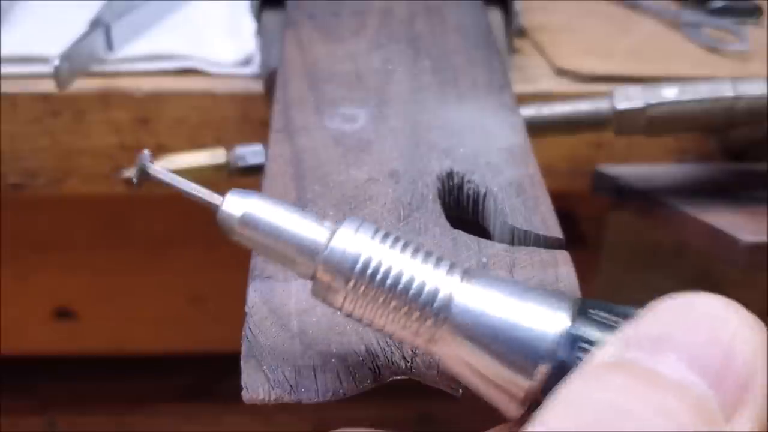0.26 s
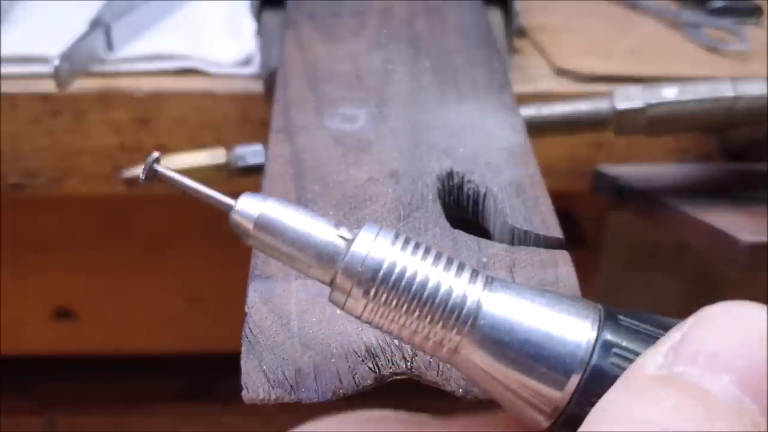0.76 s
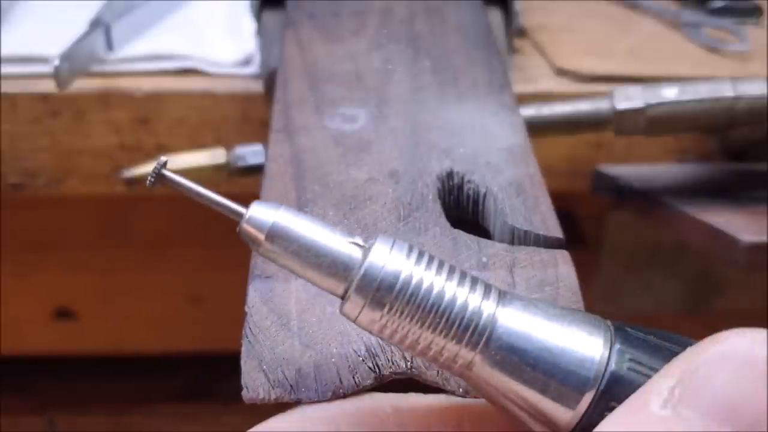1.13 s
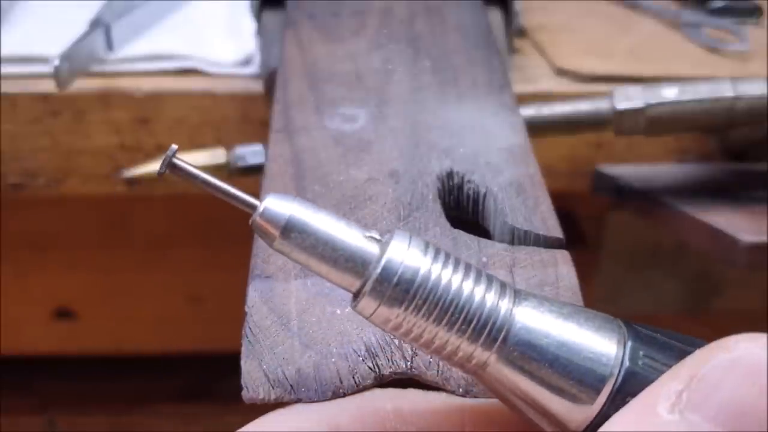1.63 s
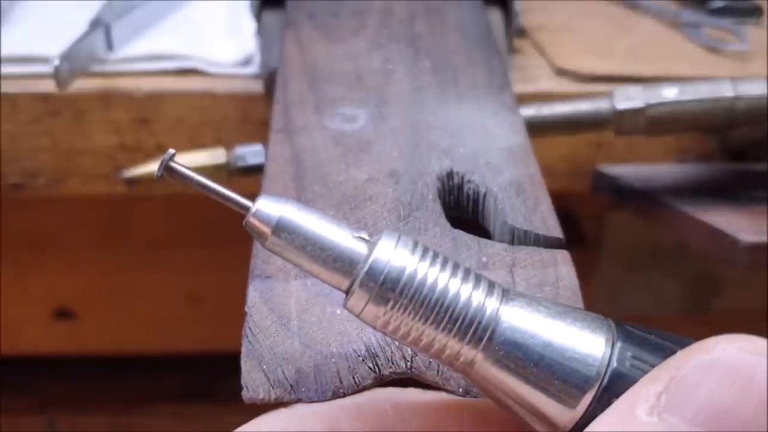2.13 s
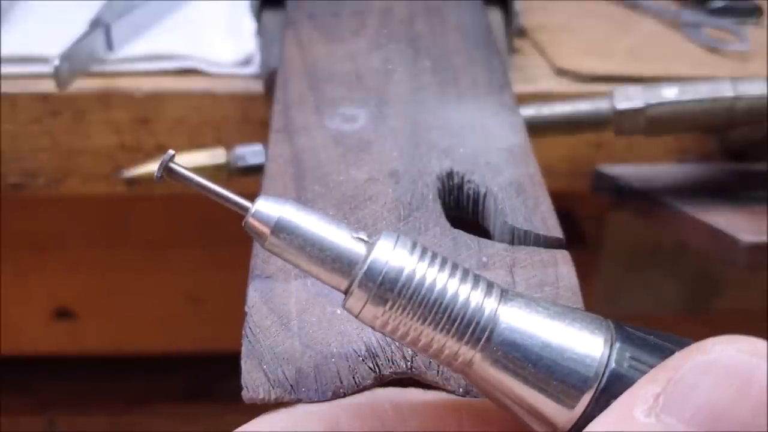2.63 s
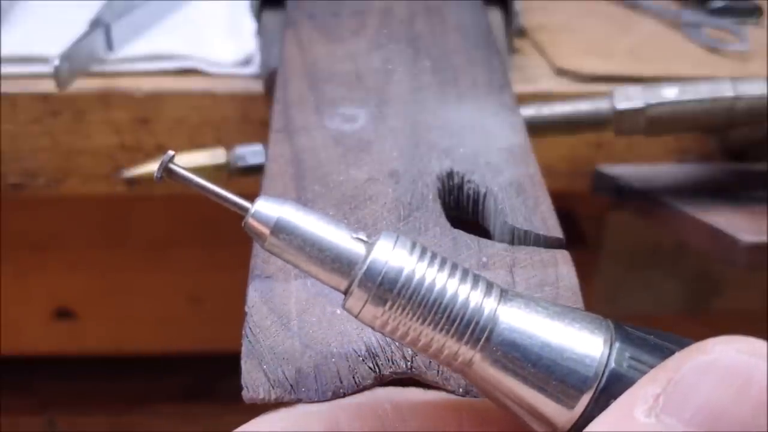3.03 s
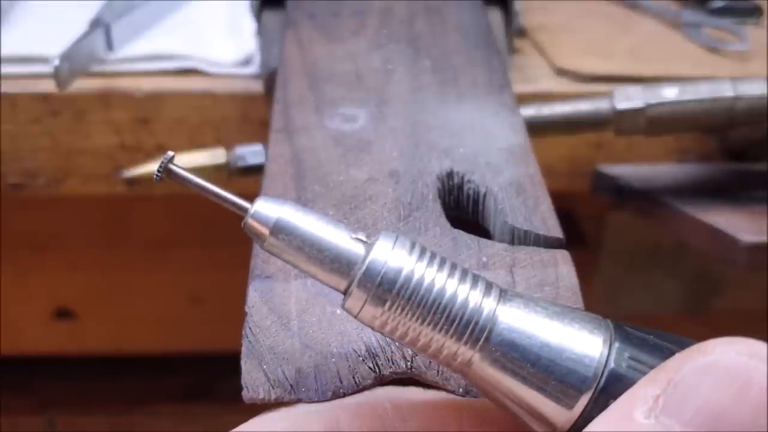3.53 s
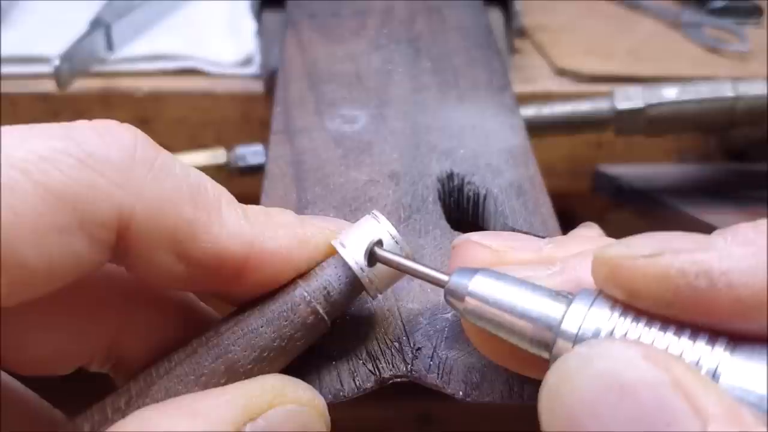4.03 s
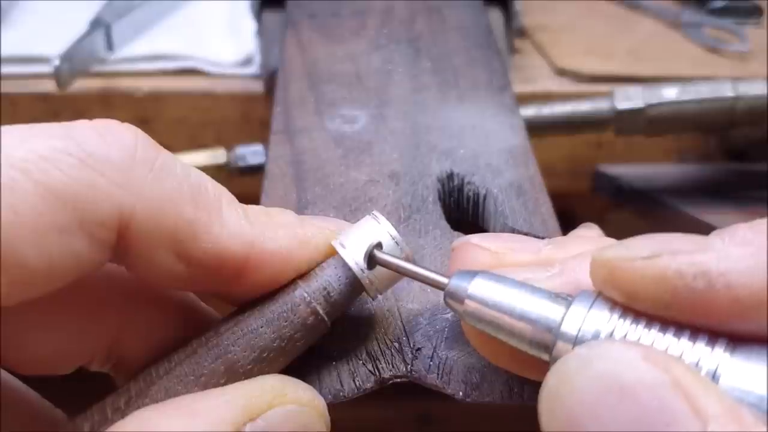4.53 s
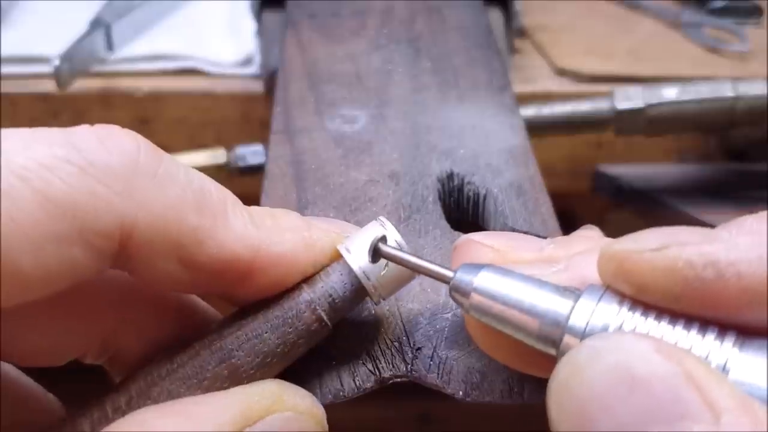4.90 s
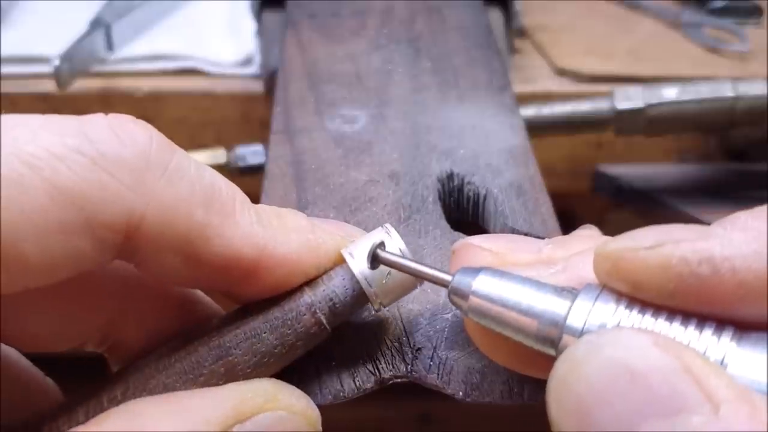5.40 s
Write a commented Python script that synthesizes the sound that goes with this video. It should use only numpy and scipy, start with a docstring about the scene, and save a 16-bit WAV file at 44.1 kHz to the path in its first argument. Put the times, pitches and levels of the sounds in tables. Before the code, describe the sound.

A faint room hiss with low hum and rumble; a click and two soft wooden knocks. A jeweller's motor tool bursts on and winds down over two seconds. Following a near-silent gap with light ticks, it starts abruptly at speed, its burr scraping metal with a bright buzzing rasp, easing off briefly, then biting in again until the end.

```python
"""In a small workshop, a latch clicks and a jeweller's rotary handpiece is blipped and coasts to rest.
Then, at full speed, its burr is pressed twice into a metal ring held on a wooden peg.
Coloured noise makes the rush and scrape; ball bearings whine at multiples of the shaft speed.
Under load the shaft slows and the burr whirls, adding low tones. Behind it lie room hiss, mains hum
and rumble; ticks ring briefly and two knocks excite the modes of the bench."""
import sys
import numpy as np
from scipy import signal
from scipy.fft import rfft, irfft
from scipy.io import wavfile
from scipy.ndimage import uniform_filter1d

SR = 44100
rng = np.random.default_rng(int(sys.argv[2]) if len(sys.argv) > 2 else 0)


def unload_wav(signal):
    """Save mono or channel-first audio to the path in sys.argv[1] as 16-bit WAV at rate SR, clipped to [-1, 1]."""
    wavfile.write(
        sys.argv[1],
        SR,
        np.round(np.clip(np.atleast_2d(signal).T, -1, 1) * 32767).astype(np.int16),
    )


N = 249606
T = np.arange(N) / SR   # seconds
HZ = np.maximum(np.fft.rfftfreq(N, 1 / SR), 1)


def amp(db):
    """Decibels to an amplitude factor."""
    return 10 ** (np.asarray(db) / 20)


def rms_of(x):
    """Root mean square level."""
    return np.sqrt(np.mean(x ** 2))


def rms_one(x):
    """The sound scaled to rms 1."""
    return x / np.sqrt(np.mean(x ** 2) + 1e-20)


def in_time(rows):
    """Every column after the first, drawn as a line through its points in seconds."""
    seconds, *columns = np.transpose(rows)
    return [np.interp(T, seconds, column) for column in columns]


def at_hz(points):
    """A curve through (Hz, value) points, straight over log frequency."""
    hz, value = np.transpose(points)
    return np.interp(np.log(HZ), np.log(np.maximum(hz, 1)), value)


def drift(rate):
    """Slow chance, new about rate times a second; spread about 1."""
    count = int(N / SR * rate) + 2
    return np.interp(T * rate, np.arange(count), rng.standard_normal(200)[:count])


def hiss(spectrum, gate=1):
    """Two unrelated noises, gated, then coloured; rms 1."""
    noise = gate * rng.standard_normal((2, N))
    return rms_one(irfft(rfft(noise) * amp(at_hz(spectrum)), N))


def blurred_tone(hz, blur_hz):
    """Two sines whose pitch wavers at random, smoothly, which widens the line; rms 1."""
    waver = uniform_filter1d(rng.standard_normal((2, N)), size=24, axis=1)
    step = 2 * np.pi * hz / SR + np.sqrt(2 * np.pi * blur_hz / SR) * waver
    audible = hz < SR / 2   # silent where it would alias
    return np.sqrt(2) * np.sin(np.cumsum(step, axis=1)) * audible


def patchy(x, patchy_db):
    """Level flickers in patches about 500 Hz wide and 20 ms long; rms 1."""
    z = signal.stft(x, nperseg=256)[2]
    chance = rng.standard_normal(z.shape[1:])
    field = uniform_filter1d(uniform_filter1d(chance, size=3, axis=0), size=6, axis=1)
    flickering = z * amp(patchy_db * rms_one(field))
    return rms_one(signal.istft(flickering, nperseg=256)[1][:, :N])


def placed(pair, lag_s, pan, alike):
    """The right channel gets a delayed share of the left signal plus an unrelated one of its own."""
    a, b = rfft(pair)
    alike = np.clip(alike, 0, 1)
    tilt = amp(at_hz(pan) / 2)
    right = alike * a * np.exp(-2j * np.pi * HZ * lag_s) + np.sqrt(1 - alike ** 2) * b
    return irfft(np.array([a * tilt, right / tilt]), N)


def ring(clicks, hz, t60):
    """A struck mode: a two-pole resonator dying by 60 dB in t60 seconds."""
    r, w = amp(-60 / (t60 * SR)), 2 * np.pi * hz / SR
    return signal.lfilter([0, np.sin(w)], [1, -2 * r * np.cos(w), r * r], clicks + 1e-18)


def background():
    """Room hiss with mains hum, lumpy rumble, and a brighter opening hiss that stops short."""
    # Room hiss. Each row: frequency in Hz, density in dB per Hz.
    room_colour = [(59, -33.5), (100, -13), (135, -6.5), (177, -13.5), (315, -16), (891, -21.5),
                   (2370, -31.5), (3120, -44), (4290, -31), (5770, -37), (7700, -42), (9610, -68),
                   (16000, -75)]
    # Room level. Each row: time in seconds, level in dB.
    room_level = [(0, -57.5), (.3, -58), (1.4, -60.5), (3.5, -64.5), (3.82, -61.5), (4.0, -69.5),
                  (5.66, -75.5)]
    # Stereo tilt of the room. Each row: frequency in Hz, left minus right in dB.
    room_pan = [(60, -5), (110, -0.5), (200, -7.5), (380, 2), (700, -1), (1290, -3), (2380, 0), (4400, -7),
                (8120, 3), (15000, -2)]
    # Mains hum. One row: frequency in Hz, level over the room hiss in dB.
    mains_hz, mains_db = (120, 0.54)
    # Low rumble. Each row: frequency in Hz, density in dB per Hz.
    rumble_colour = [(12, -55.5), (25, -27), (38, 1), (52, 3), (68, 5), (88, -3.5), (105, -19.5),
                     (150, -44)]
    # Rumble level before its lumps. Each row: time in seconds, level in dB.
    rumble_level = [(0.0, -52), (1.5, -52.5), (2.2, -59.5), (3.88, -52.5), (3.94, -55.5), (4.68, -60),
                    (4.87, -72), (5.6, -60.5)]
    # Opening hiss. Each row: frequency in Hz, density in dB per Hz.
    opening_colour = [(1180, -29), (2000, 2), (2510, -1), (3810, -36), (5250, -4), (7910, -5), (9170, 3),
                      (9920, -8), (14200, -7), (16000, -19)]
    rumble_lumps_db = 3
    opening_db, opening_end_s = -64.5, .13

    room = hiss(room_colour) + amp(mains_db) * blurred_tone(mains_hz, 2.9)[0]
    room_db, = in_time(room_level)
    rumble_db, = in_time(rumble_level)
    out = amp(room_db) * room
    out += amp(rumble_db + rumble_lumps_db * drift(17)) * hiss(rumble_colour)
    out += amp(opening_db) * hiss(opening_colour) * (T < opening_end_s)
    alike = np.interp(HZ, [60, 300, 1500], [.9, .6, .3])   # lows are the most alike
    return placed(out, .0003, room_pan, alike)


def ticks():
    """A short metal ring, a crack and the room's dying hiss for each tick."""
    # Latch click and small ticks. Each row: time in seconds, strength in dB, ring in Hz.
    tick_rows = [(0.1274, -57, 7650), (0.3601, -7.5, 5640), (1.019, -70, 6800), (1.1404, -66, 7400),
                 (3.5289, -50, 7130), (3.5423, -46.5, 6700), (3.5624, -52, 4750), (3.6117, -43, 7140)]
    partials = [(1, 0.75), (2.05, 0.25), (2.7, 0.25)]   # multiple of the ring, share
    out = np.zeros((2, N))
    tail = hiss([(300, -21), (2500, -21.0), (4200, -17), (5500, -5), (6800, -18.5), (11000, -18), (16000, -17)])
    for s, db, hz in tick_rows:
        click = (np.arange(N) == round((s + .0004) * SR)) * amp(db)
        swell = signal.lfilter(np.hanning(60), 1, click)   # about a millisecond of contact
        rings = sum(share * np.sin(2 * np.pi * k * hz * T) for k, share in partials)
        crack = 0.25 * tail[0]
        out += swell * (rings + crack) * amp([[-4.], [4.]])
        dying = amp(-60 * np.abs(T - s) / 0.056) + 0.27 * amp(-60 * np.abs(T - s) / 0.19)
        out += amp(db - 17.0) * amp([[-3.], [3.]]) * tail * (T > s + .001) * dying
    return out


def knocks():
    """The tool is set on the bench: a blow and a scuff drive the bench modes and a broad thud."""
    # Tool set on the bench. Each row: time in seconds, strength of the scuff in dB.
    knock_rows = [(0.391, -54.5), (0.487, -64.5)]
    # Modes of the bench. Each row: frequency in Hz, gain in dB, 60 dB decay in seconds.
    bench_modes = [(267.4, 6, 0.051), (397, -8, 0.048), (890, -9, 0.08), (1190, -28, 0.072),
                   (1505, -18, 0.04), (1737, -23.5, 0.02), (2058, -20, 0.019)]
    blow_over_scuff_db = 16   # the first contact of each knock
    contact = np.zeros(N)
    for s, db in knock_rows:
        contact += amp(db) * (T > s) * amp(-60 * np.abs(T - s) / 0.096) * (T < s + .027)
    scuff = contact * rng.standard_normal(N)   # many small contacts while the tool settles
    for s, db in knock_rows:
        scuff[round(s * SR)] += amp(db + blow_over_scuff_db)
    body = sum(amp(db) * ring(scuff, hz, t60) for hz, db, t60 in bench_modes)
    thud = signal.sosfilt(signal.butter(3, [230, 1700], "band", fs=SR, output="sos"), scuff)
    return (body + amp(24.5) * thud) * amp([[1.5], [-1.5]])


def whine(shaft, blur_hz, flutter_db):
    """Multiples of the ball-pass rate, each fluttering on its own, coloured by the shell; rms 1."""
    # Bearing whine. Each row: multiple of the ball-pass rate, level in dB.
    whine_lines = [(2, -9), (3, 1), (4, -4), (5, -4), (6, -2), (7, -3), (8, -3), (9, -2), (10, -2),
                   (11, -2), (12, -3), (13, -4)]
    # How the shell radiates the whine. Each row: frequency in Hz, gain in dB.
    shell_gain = [(1500, -25), (3700, -18), (4250, -3), (5200, 0), (6300, -8), (7700, 0), (8800, -9),
                  (9800, -1), (10900, -9), (12000, -15), (14000, -8), (16000, -15)]
    ball_pass = 6.85   # ball passes per shaft turn
    tones = np.zeros((2, N))
    for k, db in whine_lines:
        level = amp(db + flutter_db * drift(14))
        tones += level * blurred_tone(k * ball_pass * shaft, blur_hz * k / 3)
    return rms_one(irfft(rfft(tones) * amp(at_hz(shell_gain)), N))


def coast_speed():
    """A straight spin-up rounds over into a slowing by drag and dry friction; turns per s."""
    spin_up_s, spin_up_hz_per_s, rounding_hz = 1.411, 1030, 20
    coast_from_s, coast_from_hz, drag_s, friction_hz = 1.73, 251, 2.04, 157
    rising = spin_up_hz_per_s * (T - spin_up_s)
    falling = (coast_from_hz + friction_hz) * np.exp((coast_from_s - T) / drag_s) - friction_hz
    rounded = -rounding_hz * np.logaddexp(-rising / rounding_hz, -falling / rounding_hz)
    return np.maximum(rounded, 0)


def coasting():
    """Free running: shell rush pulsing once a turn, rattle, whine and a hum of unbalance."""
    # Rush of the coasting motor. Each row: time in seconds, level in dB.
    rush_level = [(1.46, -39), (1.51, -33), (1.59, -30), (2.3, -33.5), (2.76, -36.5), (3.03, -39.5),
                  (3.33, -48), (3.53, -65.5), (3.7, -80)]
    # Colours of the rush, the rattle and the top. Each row: frequency in Hz, density in dB per Hz.
    rush_colour = [(1650, -28.5), (2800, -12), (3210, -16), (3440, -4.5), (3810, -17.5), (4200, -5.5),
                   (4940, 1.5), (5230, -1.5), (5830, -0.5), (6650, -5), (7540, 3.5), (8260, -5.5),
                   (10600, -8), (11000, -16.5), (14300, -28), (22000, -120)]
    rattle_colour = [(120, -45), (200, -17), (555, -19), (873, -9.5), (947, -16), (1040, -4), (1280, -6.5),
                     (1770, 0), (3200, -14.5), (4160, -6), (7040, -120)]
    top_colour = [(9500, -8), (11200, 2.5), (13000, 6), (15200, 7), (17000, -1)]
    # Stereo tilt of the coasting motor. Each row: frequency in Hz, left minus right in dB.
    coast_pan = [(60, 4), (110, -4), (200, -0.5), (700, 1.5), (2380, 3), (4400, -7.5), (8120, -7),
                 (15000, 1.5)]
    blip_s = 1.455   # the motor is first heard
    mid_coast_db = -33   # rush level at which the next levels hold
    rattle_mid_db, rattle_follows = -47, 0.31   # dB; dB per dB of rush
    top_mid_db, top_follows = -37, 1.62
    whine_re_rush_db, whine_db_per_hz = -14, .025   # grows with speed
    hum_db, peak_db, peak_hz, peak_width_hz = -66, -45, 247.7, 9.6   # the hum swells near top speed

    shaft = coast_speed()
    rush_db, = in_time(rush_level)
    rattle_db = rattle_mid_db + rattle_follows * (rush_db - mid_coast_db)
    top_db = top_mid_db + top_follows * (rush_db - mid_coast_db)
    whine_db = rush_db + whine_re_rush_db + whine_db_per_hz * shaft
    turn = np.cumsum(2 * np.pi * shaft / SR)
    beat = 1 + 0.031 * np.cos(turn)

    out = amp(rush_db) * hiss(rush_colour, beat)
    out += amp(rattle_db) * hiss(rattle_colour, beat)
    out += amp(top_db) * hiss(top_colour, beat)
    out = rms_of(out) * patchy(out, patchy_db=1.8)
    sidebands = 1 + .5 * np.cos(turn)   # each ball is loaded once a turn
    out += amp(whine_db) * sidebands * whine(shaft, 18., flutter_db=3.)
    hum = amp(hum_db) + amp(peak_db) / (1 + ((shaft - peak_hz) / peak_width_hz) ** 2)
    out += hum * np.sin(turn)
    on = np.clip((T - blip_s) / 0.0045, 0, 1) * np.clip((rush_level[-1][0] - T) / 0.3, 0, 1)
    return on * placed(out, 0.0004776, coast_pan, alike=0.28)


def work_speed(load):
    """Full speed less the load, which the motor follows with a lag; turns per s."""
    full_speed_hz, motor_lag_s = 394.5, .19
    r = np.exp(-1 / (motor_lag_s * SR))
    return full_speed_hz - signal.lfilter([1 - r], [1, -r], load)


def work_noise(load, shaft, turn, whirl):
    """Bright scrape and rattle over the free rush, pulsing with turn and whirl, plus bearing whine."""
    # Running and cutting noise. Each row: time in seconds, level above 3 kHz in dB, below 3 kHz in dB.
    noise_levels = [(3.85, -29, -44), (4.06, -24, -37.5), (4.37, -20.5, -39), (4.656, -18.5, -39),
                    (4.69, -21, -39.5), (4.742, -36.5, -52), (5.22, -34, -50), (5.392, -22.5, -42.5),
                    (5.564, -19.5, -39.5), (5.66, -17.5, -39.5)]
    # Colours, unloaded and cutting, high and low. Each row: frequency in Hz, density in dB per Hz.
    free_rush = [(1650, -30.5), (2800, -11), (3120, -12), (4310, -10), (5230, 3), (5660, -2), (6440, -2.5),
                 (7330, -5), (7880, -7), (8530, -2.5), (10600, -4.5), (11500, -11.5), (15600, -8)]
    free_rattle = [(150, -26), (400, -17), (900, -7.5), (1500, -1.5), (2000, 1.5), (3200, -4), (4200, -40)]
    cut_rush = [(1650, -68), (2800, -24), (3520, -13.5), (3710, -16), (5230, -8.5), (5870, -9),
                (6590, -1.5), (7600, -2), (7880, 0), (8970, -15.5), (9990, -3), (11300, -11), (13100, -9.5),
                (14000, -1), (15600, -15)]
    cut_rattle = [(76, -29), (130, -8), (216, -16), (323, -8.5), (464, -9.5), (685, -7.5), (849, -6.5),
                  (3200, -7), (4160, -12), (7040, -120)]
    free_db, free_rattle_db = -29, -52.5   # noise above these takes the cutting colour
    blur_hz, blur_per_load = 20, 1.2   # width at the third multiple; widens with load
    whine_re_noise_db, whine_db_per_load = -12, .06   # grows with load
    ball_grip_per_load = .00045   # loaded balls slip less, so they pass a little more often

    high_db, low_db = in_time(noise_levels)
    beat = 1 + 0.1 * np.cos(turn) + 0.059 * np.cos(whirl)
    free = np.minimum(amp(high_db), amp(free_db))
    scrape = np.sqrt(amp(high_db) ** 2 - free ** 2)
    out = free * patchy(hiss(free_rush, beat), patchy_db=2.0)
    out += scrape * patchy(hiss(cut_rush, beat), patchy_db=2.5)
    idle = np.minimum(amp(low_db), amp(free_rattle_db))
    chatter = np.sqrt(amp(low_db) ** 2 - idle ** 2)
    out += idle * patchy(hiss(free_rattle, beat), patchy_db=-3.0)
    out += chatter * patchy(hiss(cut_rattle, beat), patchy_db=2.0)

    whine_level = amp(high_db + whine_re_noise_db + whine_db_per_load * load)
    sidebands = 1 + .8 * np.cos(turn)
    ball_speed = shaft * (1 + ball_grip_per_load * load)
    out += whine_level * sidebands * whine(ball_speed, blur_hz + blur_per_load * load, flutter_db=3.5)
    return out


def work_hum(turn, whirl):
    """Low tones: shaft multiples, whirl, bearing lines, and sum and difference tones of shaft and whirl."""
    # Low tones. Each row: time in seconds, shaft hum in dB, whirl in dB, sum tone in dB.
    tone_levels = [(3.9, -56, -82, -88), (4.0, -48, -62, -47.5), (4.25, -50.5, -51, -46),
                   (4.36, -65, -50, -46.5), (4.57, -46, -41, -54.5), (4.7, -51, -42.5, -63),
                   (4.76, -67, -84, -87), (5.2, -58.5, -81, -72), (5.29, -54, -59, -51.5),
                   (5.43, -66, -57, -58), (5.53, -55, -43.5, -60), (5.66, -57, -46.5, -56)]
    # Bearing tones between the shaft multiples. Each row: multiple of shaft speed, level in dB.
    cage_lines = [(4.22, -63), (4.62, -64)]
    hum_db, whirl_db, sum_db = in_time(tone_levels)
    overtone_flutter_db = 4
    second_db, third_db = (db + overtone_flutter_db * drift(14) for db in (-70, -65))
    hum = amp(hum_db) * np.sin(turn)
    hum += amp(second_db) * np.sin(2 * turn) + amp(third_db) * np.sin(3 * turn)
    hum += amp(whirl_db) * np.sin(whirl)
    hum += sum(amp(db + 6.3 * drift(15)) * np.sin(k * turn) for k, db in cage_lines)
    mixed = np.sin(turn + whirl) + amp(-9.5) * np.sin(2 * whirl) + amp(-34) * np.sin(2 * turn - whirl)
    hum += amp(sum_db) * mixed
    return hum * amp(3.5 * drift(30))   # uneven grip makes the hum waver


def working():
    """The burr at work: load slows the shaft, and the burr whirls a little slower than it turns."""
    # Load on the burr. Each row: time in seconds, speed loss it would settle at in turns per s.
    load_rows = [(4.0, 0), (4.25, 22), (4.7, 90), (4.72, 0), (5.26, 4), (5.34, 44), (5.66, 92)]
    # Stereo tilt of the work noise. Each row: frequency in Hz, left minus right in dB.
    work_pan = [(60, -13), (110, 11), (200, -8), (700, 0), (2380, -2.5), (4400, -7), (8120, -1.5),
                (15000, 3)]
    work_start_s = 3.831   # the sound starts abruptly
    whirl_share, whirl_share_per_load = .858, -.00025   # whirl speed as a share of shaft speed

    load, = in_time(load_rows)
    shaft = work_speed(load)
    ratio = whirl_share + whirl_share_per_load * load
    turn = np.cumsum(2 * np.pi * shaft / SR)
    whirl = np.cumsum(2 * np.pi * ratio * shaft / SR + .006 * rng.standard_normal(N))
    noise = work_noise(load, shaft, turn, whirl)
    hum = work_hum(turn, whirl)
    late = np.roll(hum, 12)   # samples: the hum reaches the right channel a little later
    on = np.clip((T - work_start_s) / 0.004, 0, 1)
    hum_pair = np.sqrt(2) * np.array([hum, late]) * amp([[-1], [1]])
    return on * (placed(noise, .00009, work_pan, alike=0.26) + hum_pair)


def scene():
    """All layers together."""
    return background() + ticks() + knocks() + coasting() + working()


def record(dry):
    """The top is cut steeply."""
    cutoff_hz = 15950
    return signal.sosfilt(signal.ellip(12, .5, 60, cutoff_hz, fs=SR, output="sos"), dry)


dry = scene()
out = record(dry)
unload_wav(out)
```